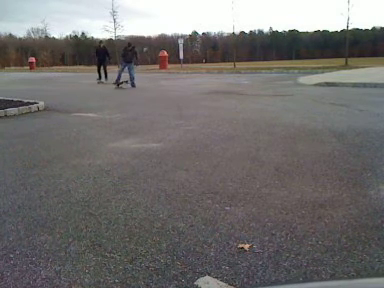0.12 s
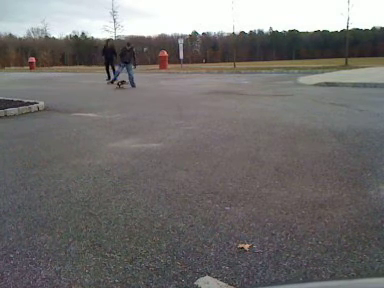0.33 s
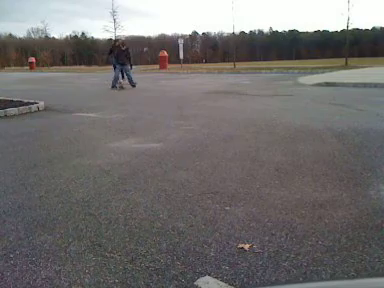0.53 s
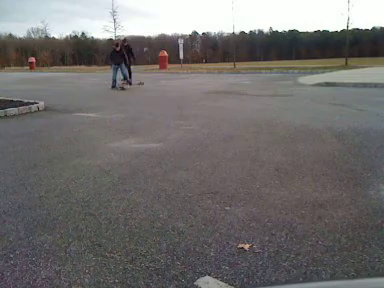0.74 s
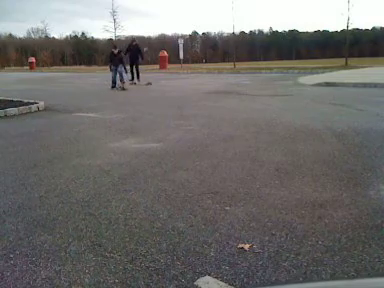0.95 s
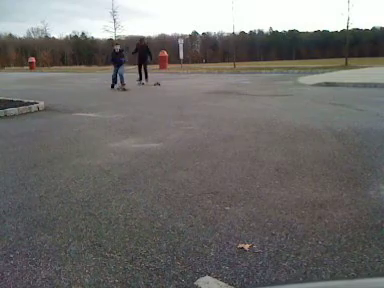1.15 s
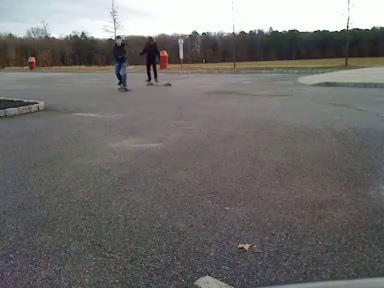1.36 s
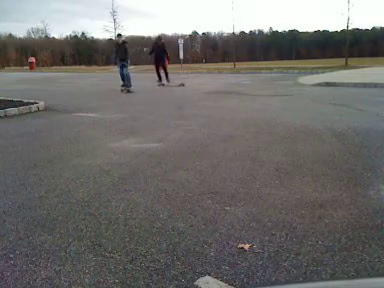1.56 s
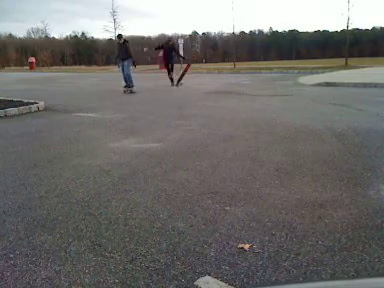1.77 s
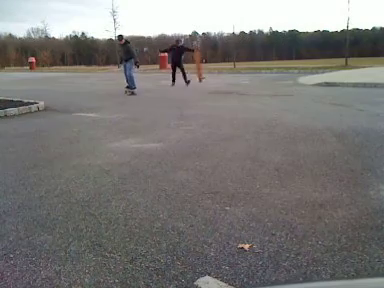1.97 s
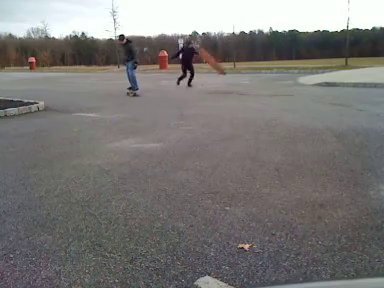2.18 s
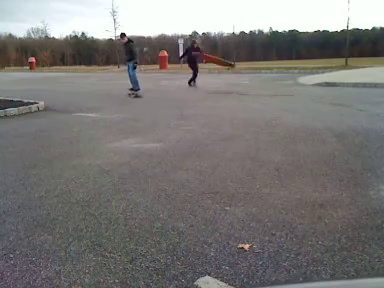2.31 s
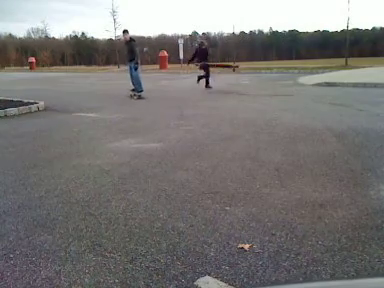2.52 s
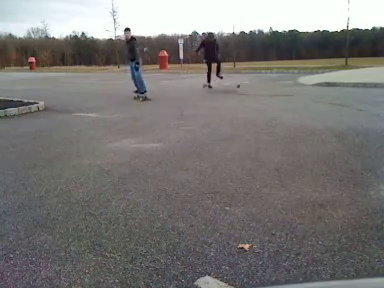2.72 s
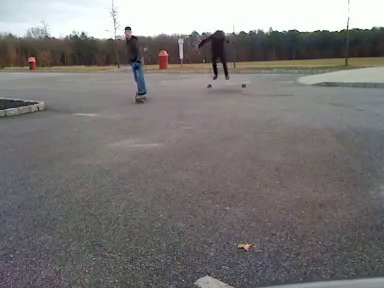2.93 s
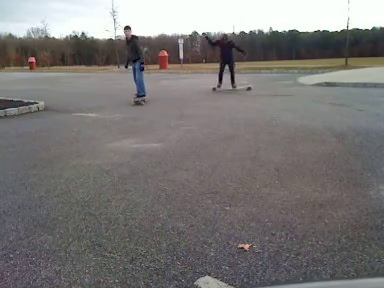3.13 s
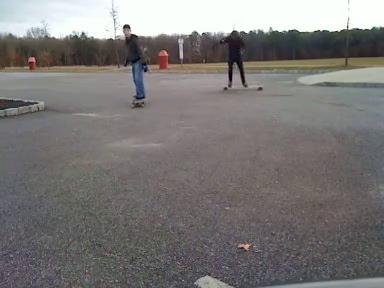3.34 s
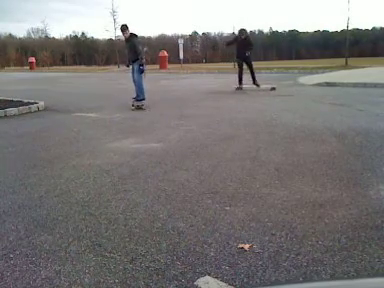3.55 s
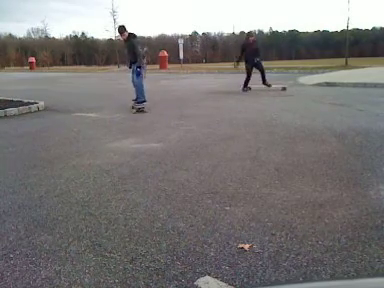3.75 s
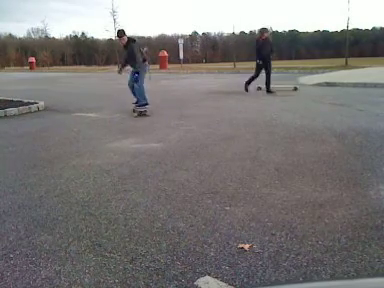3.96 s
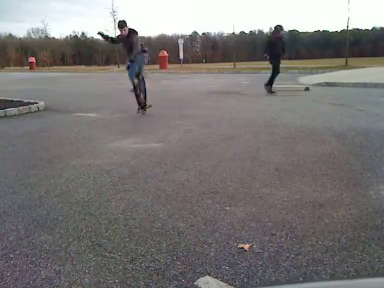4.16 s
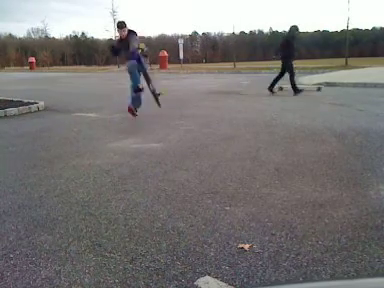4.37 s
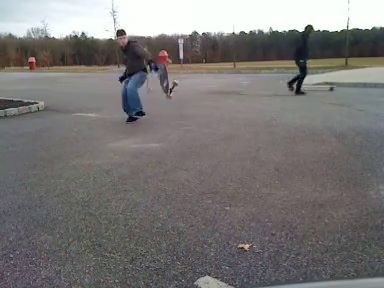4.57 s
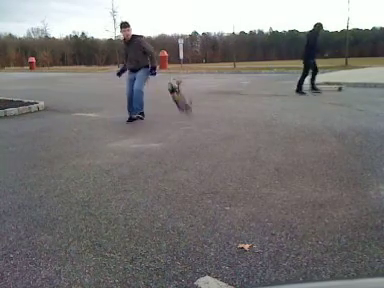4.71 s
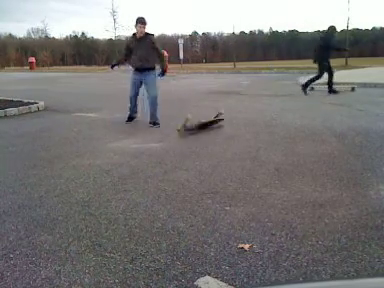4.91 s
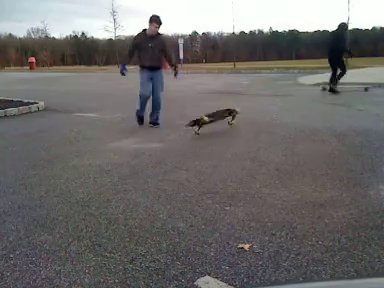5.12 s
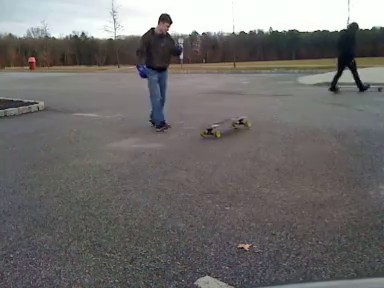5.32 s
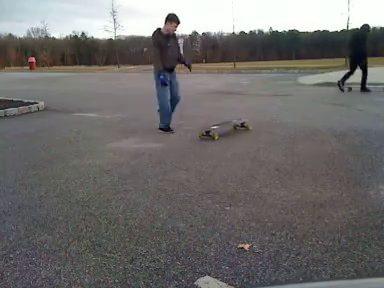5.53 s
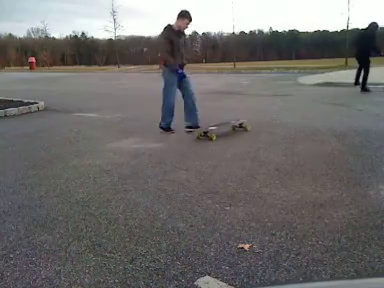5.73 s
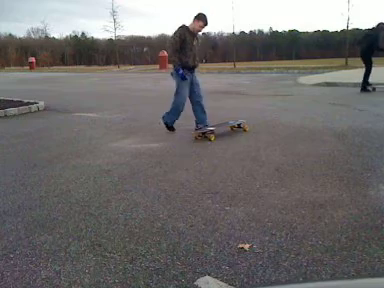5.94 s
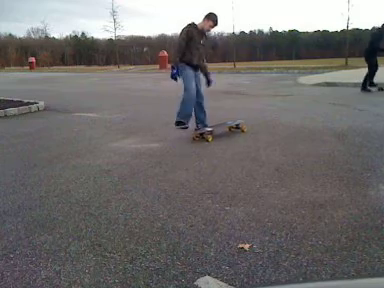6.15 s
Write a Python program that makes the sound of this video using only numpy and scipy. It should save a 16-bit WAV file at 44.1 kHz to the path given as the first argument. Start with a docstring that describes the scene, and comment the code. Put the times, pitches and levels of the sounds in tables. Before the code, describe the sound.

Two longboards are ridden and flipped on gritty pavement, heard from a fixed spot. The far board gives a dry woody crack and later a muffled landing between light steps. After four seconds the closer board snaps hard, a sole thumps, and the deck hits twice with hollow clatter and gritty skids. Small stones tick, wheels hiss faintly, and distant traffic rumbles beneath.

```python
"""Longboard tricks on asphalt

Two riders flip longboards on an open lot: tails scrape and pop, decks land and bounce, feet stamp.
Decks are ringing modes shaken by rough volleys of knocks; soles add a low thump, a slap and a crunch.
Wheels grind and hiss over grit as thousands of random knocks, and stones crack as short ticks.
Filtered noise gives the traffic rumble and air hiss; a near wall and far trees echo the blows."""
import sys
import numpy as np
from scipy import signal
from scipy.fft import next_fast_len
from scipy.io import wavfile
from scipy.ndimage import uniform_filter1d

SR = 44100
rng = np.random.default_rng(int(sys.argv[2]) if len(sys.argv) > 2 else 0)


def dump_mix(stems):
    """Bounce the given channels to the path in sys.argv[1] as a 16-bit WAV at rate SR."""
    frames = np.atleast_2d(stems).T  # one column per channel
    limited = np.clip(frames, -1, 1)  # hard clip at full scale
    pcm = np.round(limited * 32767).astype(np.int16)
    wavfile.write(sys.argv[1], SR, pcm)


N = 272968  # length in samples


def gain_of(db):
    """Turns decibels into amplitude."""
    return 10 ** (np.asarray(db) / 20)


def evened(x):
    """Scales a sound to an average (rms) level of 1."""
    return x / np.sqrt(np.mean(x ** 2) + 1e-20)


def peaked(x, db):
    """Scales a sound so that its level, smoothed over 200 samples, peaks at the given dB."""
    smooth_power = uniform_filter1d(x ** 2, size=200)
    return gain_of(db) * x / np.sqrt(smooth_power.max())


def add(mix, s, sound):
    """Mixes a sound in at a time in seconds, cut off where the mix ends."""
    part = mix[round(s * SR):][:len(sound)]
    part += sound[:len(part)]


def curve(rows):
    """Draws straight lines between the rows of a table: one value a sample for each column."""
    s, *columns = np.transpose(rows)
    return [np.interp(np.arange(N) / SR, s, column) for column in columns]


def slow(cutoff_hz):
    """Low-passed noise of rms 1: a random wander, faster for a higher cutoff."""
    low_pass = signal.butter(2, cutoff_hz, fs=SR, output="sos")
    return evened(signal.sosfiltfilt(low_pass, rng.standard_normal(N)))


def around(x, hz, octaves):
    """A gentle band-pass around one pitch."""
    edges = np.clip(hz * 2 ** np.array([-octaves / 2, octaves / 2]), 20, SR / 2.2)
    return signal.sosfilt(signal.butter(1, edges, "band", fs=SR, output="sos"), x)


def coloured(x, points):
    """Gives a sound a spectrum with a filter that never acts ahead of time (minimum phase)."""
    f, db = np.transpose(points)
    hz = np.abs(np.fft.fftfreq(8192, 1 / SR))
    wanted_db = np.interp(np.log(hz + 1), np.log(f), db)
    log_gain = np.log(gain_of(np.maximum(wanted_db, -100)))
    taps = np.fft.ifft(np.exp(np.conj(signal.hilbert(log_gain)))).real[:4096]
    taps /= np.linalg.norm(taps)  # white noise keeps its power
    return signal.oaconvolve(x, taps)[:len(x)]


def burst(dies_s, rise_s=0.00023):
    """A rough contact: a volley of tiny knocks that swells and falls by 60 dB in dies_s."""
    t = np.arange(4096) / SR
    knocks = rng.standard_normal(len(t)) * gain_of(4.16 * rng.exponential(1, len(t)))
    knocks *= 1 + 1.6 * np.exp(-t / 0.00072)  # the first touch is the hardest
    return knocks * gain_of(-60 * t / dies_s) * (1 - np.exp(-t / rise_s))


def background():
    """Distant traffic rumbles under a smooth hiss of air and electronics, both filtered noise."""
    # How loud the traffic is. Each row: time in seconds, level in dB.
    traffic = [(0.0, -50), (0.4, -48), (1.3, -49.5), (1.96, -46), (2.29, -49.5), (2.6, -47), (3.05, -49),
               (5.0, -47.5), (5.36, -49), (5.76, -50), (6.19, -48.5)]
    # Spectrum of the traffic. Each row: frequency in Hz, relative level in dB per Hz.
    rumble_spectrum = [(8.8, -30), (15, -4), (43, 1), (103, 0.5), (187, -11.5), (236, -9.5), (275, -20.5),
                       (334, -24.5), (510, -25), (551, -26), (655, -43.5), (1290, -30), (1500, -73),
                       (1950, -88), (3300, -120)]
    # Spectrum of the hiss. Each row: frequency in Hz, relative level in dB per Hz.
    air_spectrum = [(180, -35), (300, -7), (332, -2), (626, -11.5), (1240, -18.5), (1800, -20), (3950, -28),
                    (4820, -28), (11500, -28.5), (15300, -37), (16400, -33)]
    air_db = -65.5
    rumble = evened(coloured(rng.standard_normal(N), rumble_spectrum))
    rumble *= gain_of(curve(traffic)[0] + 0.2 * slow(12.0))
    air = evened(coloured(rng.standard_normal(N), air_spectrum))
    return rumble + gain_of(air_db) * air


def contact():
    """Strength of grinding and hiss: steady rolling plus skids that rise, hold and fade."""
    # Steady rolling. Each row: time in seconds, grinding heard through the deck in dB,
    # hiss of grit and bearings in dB.
    rolling = [(0, -57, -75), (.45, -59, -79), (1.0, -58.5, -80.5), (1.6, -57.5, -73.5), (2.0, -56, -78),
               (2.65, -59, -76.5), (3.3, -57.5, -74.5), (3.85, -58, -73.5), (4.3, -56.5, -70),
               (4.7, -57, -79), (5.2, -56, -77), (5.92, -57.5, -80), (6.19, -52, -76)]
    # Skids and scuffs over the grit. Each row: start in seconds, length in seconds,
    # grinding in dB, hiss in dB.
    skids = [(0.585, 0.14, -56, -76.5), (2.795, 0.036, -50, -59), (3.064, 0.059, -50.5, -75),
             (4.111, 0.081, -46.5, -67.5), (4.432, 0.097, -47, -69.5), (4.535, 0.068, -60.5, -67.5),
             (4.799, 0.049, -40.5, -59), (4.933, 0.052, -50, -73), (5.02, 0.044, -43.5, -64),
             (5.275, 0.087, -53.5, -61), (5.499, 0.21, -54, -65.5), (5.776, 0.09, -53, -68.5)]
    rise_s, fade_db_per_s = 0.019, 250
    t = np.arange(N) / SR
    power = gain_of(curve(rolling)) ** 2
    for start, length, *db in skids:
        rise = np.clip((t - start) / rise_s, 0, 1)
        fade = gain_of(-fade_db_per_s * np.maximum(t - start - length, 0))
        power = power + (gain_of(db)[:, None] * rise * fade) ** 2
    return np.sqrt(power)


def wheels():
    """Asphalt grains knock the wheels thousands of times a second; finer grit hisses."""
    # Spectrum of the grinding. Each row: frequency in Hz, relative level in dB per Hz.
    grind_spectrum = [(88, -27.5), (150, 18), (211, -2.5), (243, 8.5), (406, 1), (430, -15.5), (517, 1.5),
                      (1070, -6.5), (1220, -6), (4500, -25.5), (5850, -73), (9900, -120)]
    # Spectrum of the hiss. Each row: frequency in Hz, relative level in dB per Hz.
    hiss_spectrum = [(2500, -20), (3600, -9), (4200, -8), (4800, 0), (5400, -5), (6100, -13), (7200, -2),
                     (8000, -9), (10000, -12), (12000, -16), (13600, -10), (15000, -17), (16500, -30)]
    knocks_per_s = 5000
    grinding, hissing = contact()
    knocks = (rng.random((2, N)) < knocks_per_s / SR) * rng.standard_normal((2, N))
    knocks *= gain_of(1.95 * rng.exponential(1, (2, N)))  # a few knocks are much harder
    grind = evened(coloured(knocks[0], grind_spectrum)) * grinding * gain_of(0.55 * slow(36))
    hiss = evened(coloured(knocks[1], hiss_spectrum)) * hissing * gain_of(0.26 * slow(55))
    return grind + hiss


def board(hits, deck, dies_s):
    """Each knock sounds the low flex modes and the high clack modes of the deck, and a crunch of grit."""
    # Coarse grit under the deck edge. Each row: frequency in Hz, relative level in dB per Hz.
    coarse = [(2500, -23), (3600, 3.5), (4300, 0), (5000, 2), (6000, -6), (7200, -1.5), (8300, -9),
              (10000, -9.5), (16500, -44)]
    # Fine grit. Each row: frequency in Hz, relative level in dB per Hz.
    fine = [(5000, -41), (8000, -13), (9500, -0.5), (12000, 2), (14000, -6), (15500, -8), (16500, -29)]
    rise_s = 0.00077
    out, t = np.zeros(N), np.arange(3000) / SR
    hz, db, t60 = np.transpose(deck)[:, :, None]
    low = hz[:, 0] < 1220  # flex modes; the others clack
    for s, clack_db, flex_db, grit_db, flex_hz, clack_hz in hits:
        # where and how hard the deck is struck favours the modes near one pitch
        flex_tilt_db = -14.0 * np.log2(hz / flex_hz) ** 2
        clack_tilt_db = -12.0 * np.log2(hz / clack_hz) ** 2
        tilt_db = np.where(low[:, None], flex_tilt_db, clack_tilt_db)
        signs = rng.choice([-1., 1.], hz.shape)  # the strike place pushes each mode one way or the other
        rings = signs * gain_of(db + tilt_db - 60 * t / t60) * np.sin(2 * np.pi * hz * t)

        push = burst(dies_s, rise_s)
        flex = evened(signal.fftconvolve(push, rings[low].sum(0))[:len(push)])
        thud = push  # becomes the damped part of the flex
        for _ in range(2):
            thud = around(thud, 1.2 * flex_hz, 1.54)
        add(out, s, peaked(flex + .8 * evened(thud), flex_db))

        force = burst(dies_s, rise_s)
        ring = evened(signal.fftconvolve(force, rings[~low].sum(0))[:len(force)])
        crack = force  # countless weak modes merge into a dry crack
        for _ in range(3):
            crack = around(crack, clack_hz, 1.46)
        add(out, s, peaked(ring + evened(crack), clack_db))

        fine_db = -58 + 0.87 * (grit_db + 48.5)  # fine grit grows a little less than coarse grit
        add(out, s, peaked(coloured(force, coarse), grit_db))
        add(out, s, peaked(coloured(force, fine), fine_db))
    # a thin deck radiates no deep bass
    return signal.sosfilt(signal.butter(2, 110, "high", fs=SR, output="sos"), out)


def stones():
    """Stones crack under wheels and soles as short wide ticks: listed loud ones, random small ones."""
    # The loudest stones. Each row: time in seconds, peak level in dB, pitch in Hz.
    loud = [(1.072, -54.5, 8800), (1.4217, -63, 7300), (1.5685, -57, 7760), (2.5174, -44.5, 3400),
            (2.6763, -59, 5100), (2.7025, -60, 8160), (2.8554, -61, 3740), (3.9784, -55, 7220),
            (4.4414, -61, 4840), (4.6024, -54, 5070), (5.5345, -54, 4540), (5.6256, -55, 4600),
            (5.8117, -56, 4450), (5.819, -57, 6940)]
    small_count, small_db, spread_db, small_hz = 22, -66, 6.0, (3620, 8100)
    out = np.zeros(N)
    when, size, pitch = rng.random((small_count, 3)).T
    peak_db = small_db + spread_db * (size - .5)
    small = zip(when * N / SR, peak_db, np.interp(pitch, [0, 1], small_hz))
    for s, db, hz in [*loud, *small]:
        tick = burst(0.014)[:600]
        for _ in range(2):
            tick = around(tick, hz, 2.1)
        add(out, s, peaked(tick, db))
    return out


def feet(steps):
    """A sole gives a low thump of about two cycles; at its crest come a slap and a crunch of grit."""
    # Crushed grit. Each row: frequency in Hz, relative level in dB per Hz.
    crunch = [(2500, -5.5), (3600, 4), (4300, 3), (5000, 2.5), (6000, -1), (7200, -4.5), (8300, -2),
              (10000, -6), (12000, -16), (14000, -17), (15500, -20), (16500, -40)]
    # each pair: frequency in Hz, relative level in dB per Hz
    slap = [(400, -7), (900, -2.5), (1500, -9), (2300, -2.5), (3500, -8.5), (6000, -54.0)]
    out, t = np.zeros(N), np.arange(2000) / SR
    for s, slap_db, thump_db, hz, grit_db in steps:
        force = burst(0.03)
        thump = -np.sin(2 * np.pi * hz * t) * t ** 2 * np.exp(-t * hz / 0.21)
        add(out, s - 0.41 / hz, peaked(thump, thump_db))  # starts early so that its crest meets the slap
        add(out, s, peaked(coloured(force, slap), slap_db))
        add(out, s, peaked(coloured(force, crunch), grit_db))
    return out


def outdoors(x, tail, echoes=()):
    """Direct sound plus single echoes and sparse scattered taps, dulled on the way back."""
    # Colour of the scattered return. Each row: frequency in Hz, relative level in dB.
    return_colour = [(150, -12.5), (500, -7), (1100, -2.5), (1700, -3.5), (2500, -5.5), (3300, -5),
                     (4500, -7), (8000, -3), (16000, -7)]
    delay_s, db = np.transpose(tail)
    at = np.arange(0, SR, 20) + rng.integers(0, 20, SR // 20)  # one tap somewhere in every 20 samples
    tap_db = np.interp(at / SR, delay_s, db, -200, -200) - 12
    taps = np.zeros(SR + 20)
    taps[at] = rng.choice([-1., 1.], len(at)) * gain_of(tap_db)
    scattered = signal.hilbert(signal.oaconvolve(x, taps)[:N], next_fast_len(N))[:N]
    # the scattered sound wavers, which blurs its pitch
    blurred = (scattered * np.exp(.9j * slow(130))).real
    out = x + coloured(blurred, return_colour)
    for s, echo_db, hz in echoes:
        add(out, s, gain_of(echo_db) * around(x, hz, 2.5))
    return out


def scene():
    """The far rider is heard at the start and the end, the near rider from four to six seconds."""
    # Knocks of the boards: tails, decks and wheels on the ground, feet on the deck, and some early
    # echoes. Each row: time in seconds, clack peak in dB, deck flex peak in dB, coarse grit peak in dB,
    # flex centre in Hz, clack centre in Hz.
    hits = [(0.0872, -58, -36, -53.5, 463, 1640), (0.093, -43.5, -37.5, -62, 460, 2450),
            (0.5117, -56.5, -43, -58, 335, 2380), (0.5882, -57, -44.5, -60.5, 436, 2430),
            (0.62, -62, -61, -67, 463, 1350), (1.8191, -35, -42.5, -71, 556, 2920),
            (1.829, -30.5, -30.5, -43.5, 815, 1850), (1.8407, -36.5, -45, -66, 953, 2140),
            (1.8502, -34.5, -35, -68, 880, 1730), (1.8612, -37.5, -39, -70, 865, 2040),
            (1.879, -44, -50, -68, 830, 1840), (2.806, -42, -34.5, -45, 313, 1430),
            (2.8132, -42.5, -36.5, -47, 450, 1260), (2.8287, -47, -52, -55.5, 371, 1540),
            (3.0051, -52, -43, -54, 404, 2540), (3.0335, -56, -58, -66, 336, 1400),
            (3.0784, -65, -46, -59, 326, 1420), (3.0884, -53.5, -35.5, -57, 426, 1780),
            (3.0973, -47, -59, -50, 471, 1890), (4.146, -29.5, -30.5, -41, 1040, 2310),
            (4.1552, -22.5, -40, -45, 855, 2320), (4.1593, -29, -47, -49, 576, 1750),
            (4.1639, -19, -51, -36.5, 1170, 1950), (4.1699, -22.5, -32, -33.5, 560, 1600),
            (4.786, -27.5, -28, -30, 550, 2620), (4.7927, -44, -27.5, -40.5, 565, 1680),
            (4.9255, -18, -21.5, -32, 1120, 1580), (4.9328, -28, -17, -29.5, 464, 1710),
            (4.9405, -24.5, -29, -41, 676, 1890), (4.9527, -25.5, -21.5, -34.5, 614, 1800),
            (4.9582, -33, -23.5, -56, 297, 1710), (4.9644, -36, -31, -54, 520, 1700),
            (4.9725, -35, -39, -40, 616, 1680), (5.019, -50, -46, -48, 670, 1440),
            (5.0359, -50, -37, -47.5, 547, 1710), (5.0553, -43.5, -38, -43.5, 357, 2180),
            (5.0674, -52, -40, -53, 576, 1940), (5.249, -35, -35, -39, 490, 1850),
            (5.26, -43.5, -43, -46, 690, 1960), (5.3048, -35.5, -39.5, -42.5, 403, 2000),
            (5.3226, -43, -43, -44, 343, 1920), (5.4026, -47, -45, -50, 525, 2420),
            (5.421, -52, -44, -60, 383, 2040), (5.453, -48.5, -53, -55, 506, 2530),
            (5.4641, -53, -47, -53, 596, 1960), (5.472, -47, -63, -52.5, 397, 1450),
            (5.4865, -43, -62, -54, 373, 2470), (6.122, -45.5, -39, -76, 690, 1380),
            (6.148, -44.5, -33.5, -79, 480, 1350)]
    # Footfalls, with two early echoes after the one at 2.516. Each row: time in seconds,
    # slap peak in dB, thump peak in dB, thump pitch in Hz, grit peak in dB.
    steps = [(2.101, -44, -35, 295, -58), (2.516, -39, -32, 310, -55), (2.526, -62, -60, 302, -55),
             (2.549, -53, -51, 248, -60), (3.64, -42.5, -57.5, 272, -48.5), (3.662, -44.5, -30.5, 265, -55),
             (4.01, -45.5, -39, 420, -59.5), (4.025, -58, -38.5, 280, -65), (4.459, -68, -38, 303, -63),
             (4.481, -28, -17.5, 335, -40), (5.806, -56, -49, 397, -54)]
    # Ringing modes of the far deck. Each row: pitch in Hz, relative level in dB,
    # time to fall by 60 dB in seconds.
    far_deck = [(379, 3, 0.049), (464, 8.5, 0.037), (569, -0.5, 0.076), (706, -7.5, 0.015), (845, 6, 0.06),
                (1008, 4, 0.054), (1100, -16, 0.081), (1330, -5, 0.018), (1630, -18, 0.0082),
                (1796, -2.5, 0.033), (2270, -2.5, 0.014), (2460, 2, 0.017), (2447, -1, 0.02),
                (2780, 4, 0.0074), (3160, -5.5, 0.027), (3530, -23, .012), (4060, -4, 0.0038)]
    # Ringing modes of the near deck. Each row: pitch in Hz, relative level in dB,
    # time to fall by 60 dB in seconds.
    near_deck = [(263, 5.5, 0.062), (391, 5, 0.038), (538, 2, 0.078), (688, 1.5, 0.037), (795, -3, 0.016),
                 (920, -7.5, 0.083), (1070, 10, 0.011), (1195, 4, 0.045), (1410, -8.5, 0.11),
                 (1543, 1, 0.024), (1707, 5, 0.025), (2020, 5.5, 0.0091), (2170, -3, 0.034),
                 (2520, 12, 0.0061), (2800, -6.5, 0.021), (2840, -1, 0.018), (3500, -4, 0.013),
                 (3790, -16, 0.0046)]
    # Scattered return of the lot and the trees, far rider. Each row: delay in seconds, relative level in dB.
    far_tail = [(.004, -18), (0.048, -20), (0.128, -35.5), (.165, -24.5), (.18, -33), (.25, -36),
                (.35, -45), (.6, -54)]
    # The same for the near rider. Each row: delay in seconds, relative level in dB.
    near_tail = [(.004, -23), (0.048, -28.5), (0.109, -31.5), (.13, -39), (.19, -40.5), (.3, -49.5),
                 (.6, -55)]
    # Flutter off a wall. Each row: delay in seconds, level before its band-pass in dB,
    # best returned pitch in Hz.
    near_echoes = [(.022, -16.5, 1486), (0.044, -17, 4000), (.062, -20.5, 4000)]
    near_from_s, near_until_s, near_feet_from_s = 4.1, 6.0, 4.2

    far_hits = [row for row in hits if not near_from_s < row[0] < near_until_s]
    near_hits = [row for row in hits if near_from_s < row[0] < near_until_s]
    far_steps = [row for row in steps if row[0] < near_feet_from_s]
    near_steps = [row for row in steps if row[0] > near_feet_from_s]

    far = board(far_hits, far_deck, dies_s=.05) + feet(far_steps)
    near = board(near_hits, near_deck, dies_s=0.033) + feet(near_steps)
    blows = outdoors(far, far_tail) + outdoors(near, near_tail, near_echoes)
    return (blows + stones() + wheels() + background())[None]


def record(dry):
    """The band limit of the recorder: a steep low-pass removes the highest treble."""
    edge_hz = 16400
    low_pass = signal.firwin(511, edge_hz, window=("kaiser", 9), fs=SR)
    return signal.oaconvolve(dry, low_pass[None], "same")


dry = scene()
out = record(dry)
dump_mix(out)
```